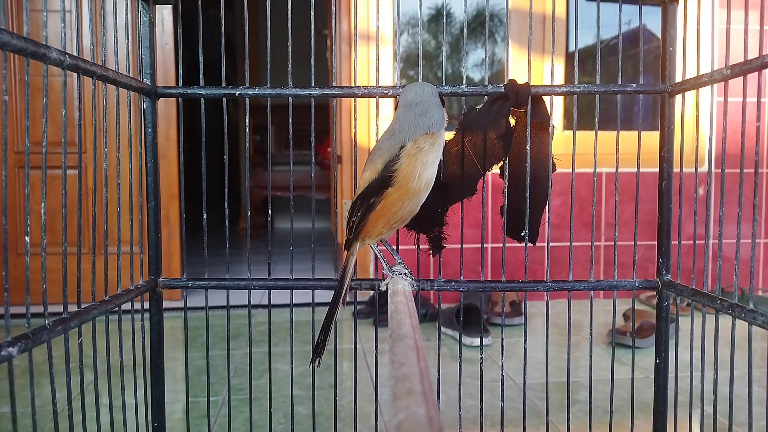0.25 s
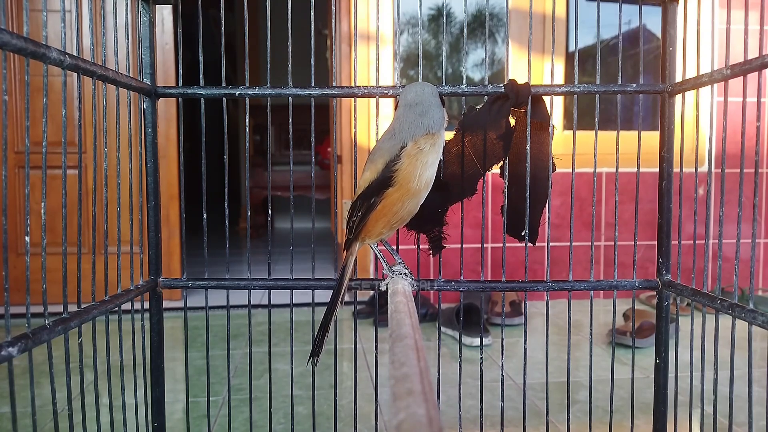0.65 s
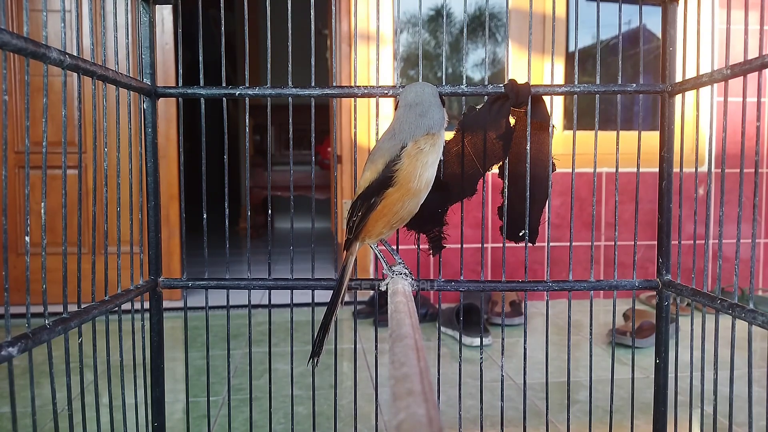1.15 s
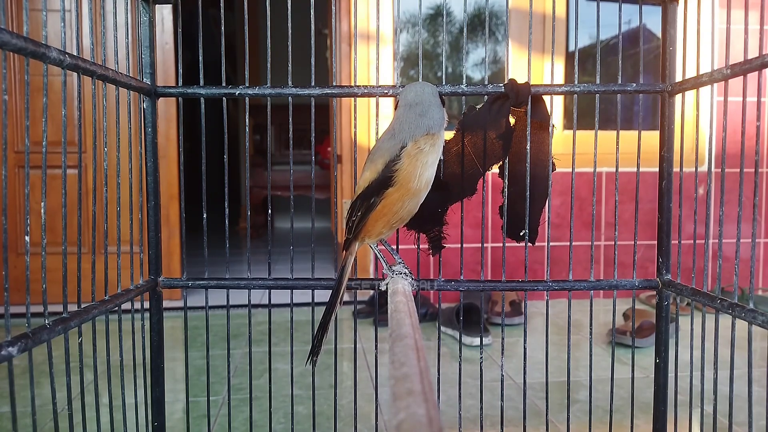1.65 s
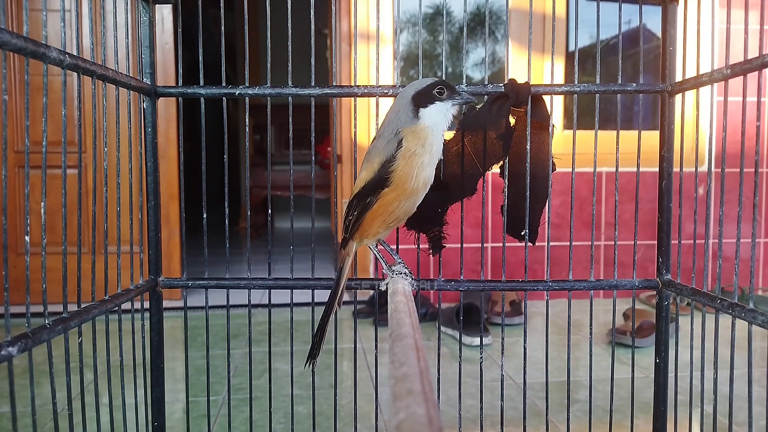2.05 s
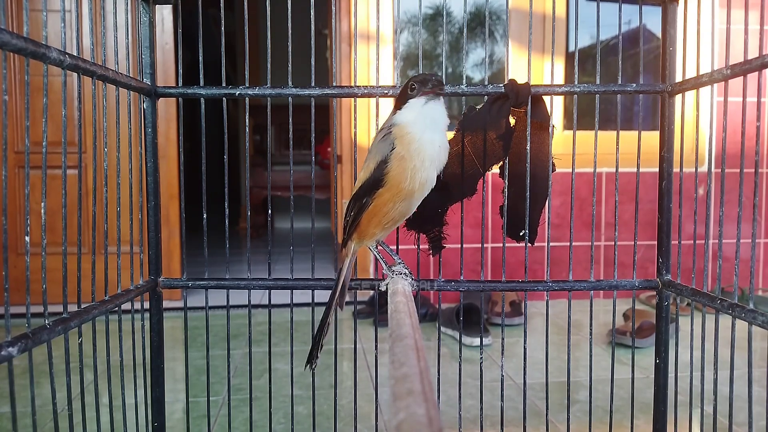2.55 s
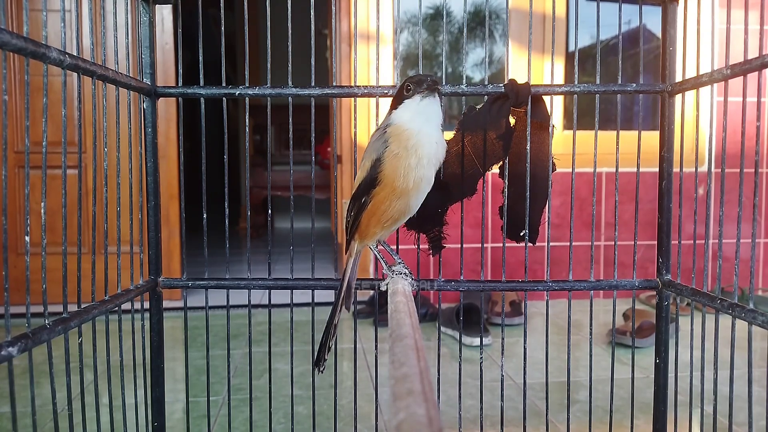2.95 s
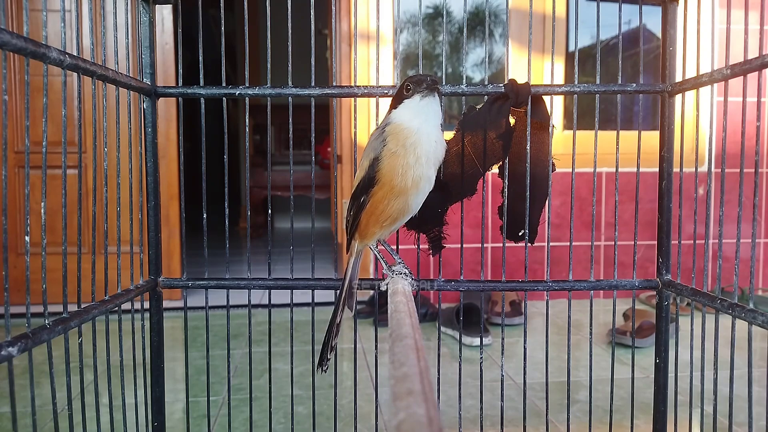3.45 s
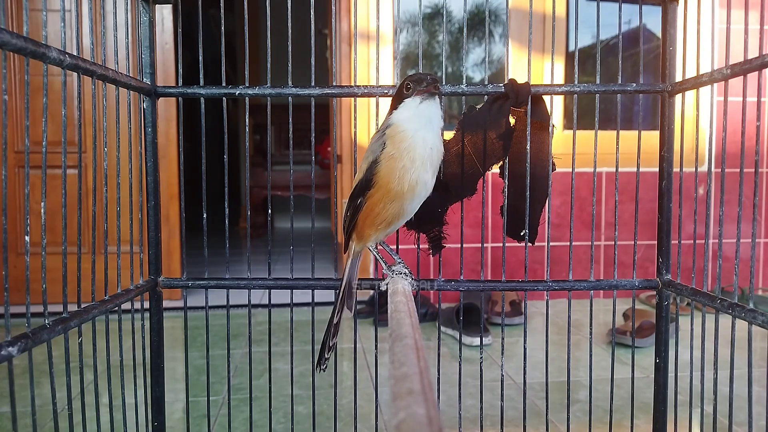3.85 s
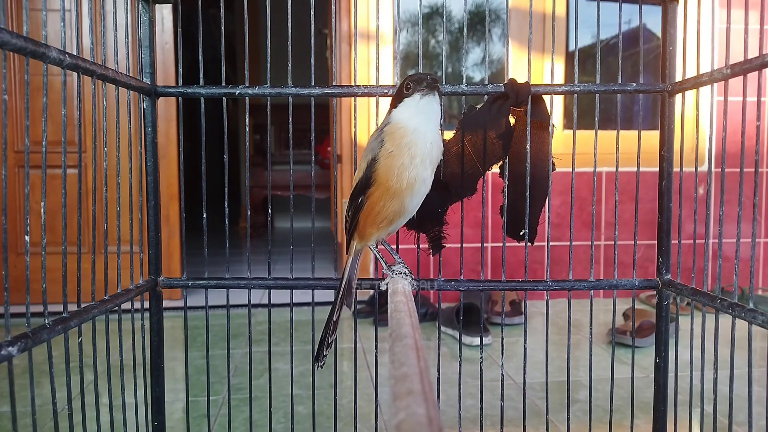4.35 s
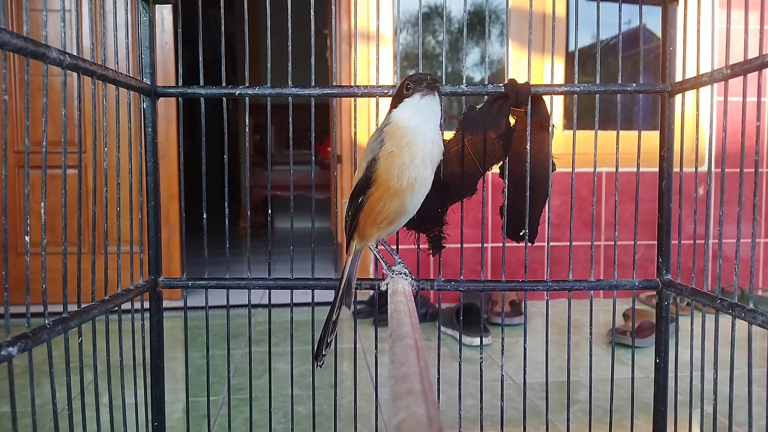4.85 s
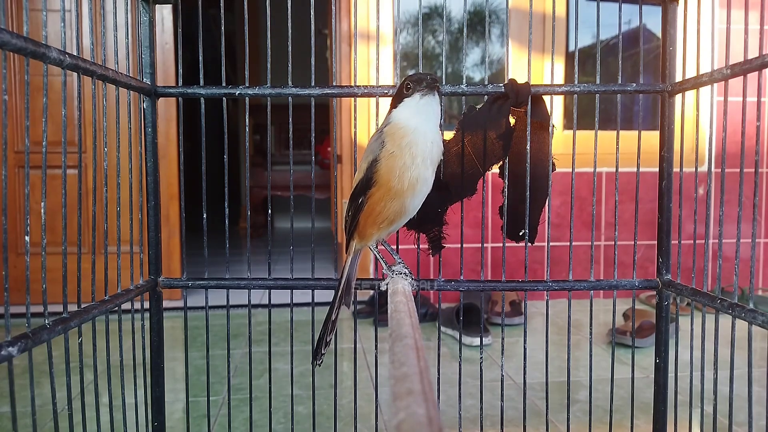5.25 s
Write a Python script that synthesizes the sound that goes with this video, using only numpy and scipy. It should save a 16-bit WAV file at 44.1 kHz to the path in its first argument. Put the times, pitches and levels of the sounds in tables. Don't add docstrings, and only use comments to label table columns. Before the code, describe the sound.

A quiet porch with far traffic rumble, thin hiss and weak insect trills. A spray bottle puffs, a dove coos far off, a second stronger puff spits droplets, and the dove ends on a low note. Feathers brush softly, then a shrike very near the microphone rasps sharply, pauses, and rasps again, longer and slightly higher. The last second and a half holds only background and tiny rustles.

```python
import sys
import numpy as np
from scipy import signal
from scipy.fft import rfft, irfft, next_fast_len
from scipy.io import wavfile
from scipy.ndimage import uniform_filter1d, minimum_filter1d, map_coordinates

SR = 44100
rng = np.random.default_rng(int(sys.argv[2]) if len(sys.argv) > 2 else 0)


def natural_amplitude(level_db):
    exponent = np.asarray(level_db, float) / 20
    return 10 ** exponent


def pcm_store(signal):
    levels = np.round(np.clip(np.atleast_2d(signal), -1, 1) * 32767)
    wavfile.write(sys.argv[1], SR, levels.astype(np.int16).T)


N = 242991

# start in seconds, length in seconds, low voice in Hz,
# high voice at its crest in Hz, high voice in the opening chirp in Hz.
RASPS = [
    (2.568, .192, 1287, 1509, 1692),
    (3.884, .23, 1314, 1551, 1768),
]


def unit(x):
    return x / np.sqrt(np.mean(x ** 2) + 1e-20)


def along(points, hz):
    f, v = np.transpose(points)
    return np.interp(np.log(hz + 1), np.log(f + 1), v)


def curves(rows):
    s, *columns = np.transpose(rows)
    return [np.interp(np.arange(N) / SR, s, column) for column in columns]


def gated_curves(tables, rise, fall):
    t = np.arange(N) / SR
    gate = 0
    for rows in tables:
        start, end = rows[0][0], rows[-1][0]
        gate = gate + np.clip(np.minimum((t - start) / rise, (end - t) / fall), 0, 1)
    return gate, curves([row for rows in tables for row in rows])


def wobble(rate):
    return map_coordinates(rng.standard_normal(int(N * rate / SR) + 4), [np.arange(N) * rate / SR])


def filtered(x, response):
    m = next_fast_len(N + SR // 2)
    return irfft(rfft(x, m) * response(np.fft.rfftfreq(m, 1 / SR)), m)[..., :N]


def band(x, low_hz, high_hz):
    return unit(filtered(x, lambda hz: 1 / (1 + (low_hz / (hz + 1)) ** 16) / (1 + (hz / high_hz) ** 16)))


def held(x, low_hz, high_hz):
    y = band(x, low_hz, high_hz)
    return y / np.sqrt(np.abs(uniform_filter1d(y ** 2, size=SR // 60)) + 1e-3)


def bumps(modes):
    return lambda hz: natural_amplitude(sum(db * np.exp(-((hz - centre) / width) ** 2) for centre, width, db in modes))


def pair(spectrum, alike):
    def mid_side(hz):
        turn = np.arccos(np.clip(along(alike, hz), -1, 1)) / 2
        return natural_amplitude(along(spectrum, hz)) * [np.cos(turn), np.sin(turn)]

    mid, side = filtered(rng.standard_normal((2, N)), mid_side)
    return unit(np.array([mid + side, mid - side]))


def traffic_and_air():
    # frequency in Hz, level in dB per Hz.
    rumble_colour = [(12, -76.5), (20, -45.5), (48, -29), (63, -11.5), (102, -0.5), (205, -3), (305, -9.5),
                     (335, -9.5), (387, -8.5), (900, -24), (1170, -56), (1980, -120)]
    # frequency in Hz, level in dB per Hz.
    air_colour = [(600, -24), (900, -0.5), (2000, -3.5), (5000, -13), (7200, -16.5), (9000, -14.5),
                  (12500, -14.5), (15500, -15.5), (16200, -29.5)]
    # frequency in Hz, left-right likeness from -1 to 1.
    likeness = [(60, 0.55), (130, 0.94), (290, 0.79), (640, 0.37), (1410, -0.11), (3100, 0.25),
                (6820, -0.092), (15000, -0.01)]
    rumble = natural_amplitude(-58.5 + 1.13 + 0.36 * wobble(1.4)) * pair(rumble_colour, likeness)
    hiss = natural_amplitude(-70 + 2.5 + 0.5 * wobble(2.4)) * pair(air_colour, likeness)
    return rumble + hiss


def crickets():
    # middle in seconds, length in seconds, level in dB.
    trills = [(0.087, 0.25, -80), (0.356, 0.14, -79), (0.827, .26, -81), (1.072, .22, -80), (1.44, .1, -83),
              (1.92, 0.25, -78.5), (2.17, .2, -79.5), (2.44, 0.22, -79), (3.3, 0.25, -81.5),
              (3.725, .19, -78), (4.465, 0.22, -81), (4.7, .2, -82), (4.9, .2, -81), (5.225, .19, -81),
              (5.455, .15, -79.5)]
    # middle in seconds, length in seconds, level in dB, pitch in Hz.
    other_insects = [
        (0.89, .3, -79, 3440),
        (2.38, .36, -89, 8200),
        (5.065, .25, -86, 8930),
        (4.87, .12, -80.5, 6400),
    ]
    t = np.arange(N) / SR
    blur = band(rng.standard_normal((2, N)), 0.92, 200)
    pitched = [(*row, 5720 + 50 * rng.standard_normal()) for row in trills]  # Hz, scattered
    song = 0
    for middle, length, db, hz in pitched + other_insects:
        song = song + natural_amplitude(db - 26 * ((t - middle) / length) ** 2) * np.sin(2 * np.pi * hz * t)
    return song * blur * natural_amplitude(6.5 + 1.5 * wobble(45))


def squirt(s, hold, db, drift, mist_db):
    pull_s, drip_s = 0.016, 0.049
    steps = [(0, -7), (pull_s, 0), (pull_s + hold, drift * hold),
             (pull_s + hold + drip_s, drift * hold - 23)]
    return [(s + u, db + change, mist_db + 0.3 * change - 51.5 * u) for u, change in steps]


def spray():
    # start in seconds, hold in seconds, level in dB, drift in dB per second,
    # fine mist in dB.
    pulls = [
        (0.15, .074, -43.5, 31, 0),
        (1.476, 0.077, -36.5, -66.5, 0.5),
    ]
    # frequency in Hz, level in dB per Hz.
    nozzle_colour = [(200, -13), (500, -15), (1100, -16.5), (2500, -9.5), (4500, -9), (7000, -12),
                     (9000, -1), (11000, -10.5), (12500, -6), (15000, -3), (16000, -13)]
    # centre in Hz, width in Hz, gain in dB.
    cavity = [(4600, 250, 6), (8000, 250, -14), (11900, 220, 7)]
    gate, (db, mist_db) = gated_curves([squirt(*row) for row in pulls], rise=0.0011, fall=0.02)
    jet = filtered(pair(nozzle_colour, [(600, 1.0), (3000, 0.074), (15000, 0.1)]), bumps(cavity))
    jet = 0.54 * band(jet, 250, 7800) + natural_amplitude(mist_db) * band(jet, 10000, 17000)
    return gate * natural_amplitude(db + 0.5 + 1.7 * wobble(150) + 1.4 * wobble(600)) * jet


def ticks():
    # start in seconds, peak in dB, highest frequency in Hz.
    spits = [(.151, -39.5, 16000), (0.169, -38.5, 7000), (0.217, -42.5, 16000), (1.477, -34.5, 15980),
             (1.508, -29.5, 15900), (1.539, -39, 16000), (1.584, -36.5, 4000), (2.151, -58, 15950),
             (2.403, -59, 16140), (2.558, -42.5, 3505), (2.857, -39.5, 16000), (2.863, -40, 15990),
             (3.719, -57, 16000), (5.23, -64, 16000)]
    t, out = np.arange(SR // 50) / SR, np.zeros((2, N))
    for s, peak_db, top_hz in spits:
        bandpass = signal.butter(2, [800, top_hz], "band", fs=SR, output="sos")
        burst = signal.sosfilt(bandpass, rng.standard_normal((2, len(t))))
        out[:, round(s * SR):][:, :len(t)] += natural_amplitude(peak_db - 60 * t / 0.013) * burst / burst.std()
    return out


def coo_note(s, length, top_hz, db, fall):
    rest_hz, swoop_s = 577, 0.021
    pouch_hz, pouch_width_hz = 673, 28.5
    u = np.linspace(0, length, num=40)
    slide_back = np.sin(np.pi / 2 * np.clip((length - u) / fall, 0, 1)) ** 1.9
    hz = rest_hz + (top_hz - rest_hz) * (1 - np.exp(-u / swoop_s)) * slide_back
    throb = np.maximum(0.15, (length > 0.3) * (hz - 670) / 60)
    swell_db = -12.5 * np.exp(-u / 0.016)
    tire_db = -9.5 * u
    level_db = db + swell_db + tire_db - ((hz - pouch_hz) / pouch_width_hz) ** 2
    return list(zip(s + u, hz, level_db, throb))


def dove():
    # start in seconds, length in seconds, top pitch in Hz, level in dB,
    # falling part in seconds.
    coos = [
        (0.545, 0.087, 760.7, -44.5, .078),
        (0.827, .228, 737, -41.5, .055),
        (1.266, 0.44, 763.8, -41, .34),
        (2.221, .157, 704, -43.5, .075),
    ]
    gate, (hz, db, throb) = gated_curves([coo_note(*row) for row in coos], rise=0.006, fall=0.007)
    flutter = 2 * np.pi * np.cumsum(80 + 50 * wobble(60)) / SR
    throb = np.clip(throb, 0, 1)
    phase = 2 * np.pi * np.cumsum(hz * (1 + 0.004 * wobble(51))) / SR
    phase = phase + 0.85 * throb * np.cos(flutter)
    return gate * natural_amplitude(db) * (1 + 0.75 * throb * np.sin(flutter)) * np.sin(phase)


def feathers():
    # time of the peak in seconds, peak in dB.
    strokes = [
        (2.055, -64),
        (2.402, -73.5),
        (2.56, -93),
        (4.974, -83),
        (5.084, -79),
        (5.206, -76.5),
        (5.33, -82),
        (5.5, -73),
    ]
    # frequency in Hz, level in dB per Hz.
    feather_colour = [(4120, -61), (7000, -32), (7760, -39), (8080, -9), (9470, 0.5), (13400, -10),
                      (15500, -27)]
    t = np.arange(N) / SR
    brush = sum(natural_amplitude(db + np.minimum(500 * (t - s), 69.5 * (s - t))) for s, db in strokes)
    return brush * natural_amplitude(2 * wobble(76)) * pair(feather_colour, [(9000, 0.2)])


def syrinx():
    # start in seconds, length in seconds, high voice in dB,
    # hoarseness as a share, beat depth from 0 to 1.
    registers = [
        (3.935, .048, -15, .5, .27),
        (3.99, .058, 5, .6, .95),
    ]
    chirp_s, snap_s, sag_s, switch_s = 0.012, 0.004, 0.021, 0.01
    chirp_low_hz, high_start_hz = 1597, 1470
    tired_hz, spent_hz = (1194, 1505), (854, 1302)
    chirp_db, rasp_db, spent_db = 3, -0.5, -4.5
    clean, early, late = (0.02, 0.05, 0.4), (0.03, 0.07, 0.55), (0.042, 0.17, 0.75)
    rows = []
    for s, length, low_hz, crest_hz, chirp_hz in RASPS:
        rows += [(s, chirp_low_hz, chirp_hz, chirp_db, *clean),
                 (s + chirp_s, chirp_low_hz, chirp_hz, chirp_db, *clean),
                 (s + chirp_s + snap_s, low_hz, high_start_hz, rasp_db, *early),
                 (s + 0.5 * length, low_hz, crest_hz, rasp_db, *late),
                 (s + 0.7 * length, low_hz, crest_hz, rasp_db, *late),
                 (s + length - sag_s, *tired_hz, rasp_db, *late),
                 (s + length, *spent_hz, spent_db, *late)]
    low_hz, high_hz, high_db, unrest, breath, depth = curves(rows)
    t = np.arange(N) / SR
    for s, length, db, hoarse, beat in registers:
        on = np.clip(np.minimum(t - s, s + length - t) / switch_s + 1, 0, 1)
        high_db = high_db + on * (db - high_db)
        depth = depth + on * (beat - depth)
        unrest = unrest * hoarse ** on
        breath = breath * hoarse ** (2.5 * on)
    return low_hz, high_hz, high_db, unrest, breath, depth


def membrane(hz, unrest):
    phase = 2 * np.pi * np.cumsum(hz * (1 + 1.15 * unrest * wobble(750))) / SR
    return sum(np.cos(k * phase + 2 * np.pi * rng.random()) for k in range(1, 13))


def windpipe(x, elapsed):
    # centre in Hz, width in Hz, gain in dB.
    side_branches = [(2050, 170, -21), (4950, 150, -17), (5900, 230, -17), (7300, 130, -10),
                     (11050, 520, -22)]
    hz, t, z = signal.stft(x, SR, nperseg=512, noverlap=384)
    at, hz = np.minimum((t * SR).astype(int), N - 1), hz[:, None]
    slide = 1.03 + (0.97 - 1.03) * np.clip(elapsed[at] / 0.2, 0, 1)
    dips = []
    for centre, width, db in side_branches:
        depth = np.clip(1 + 0.5 * wobble(25)[at], 0.6, 2)
        dips.append((centre * slide, width, db * depth))
    ceiling_hz = 15700 - 11000 * elapsed[at]
    ceiling = 1 / (1 + (hz / ceiling_hz) ** 80)
    return signal.istft(z * bumps(dips)(hz) * ceiling, SR, nperseg=512, noverlap=384)[1][:N]


def low_thumps():
    # time in seconds, level in dB.
    thumps = [
        (2.579, -40),
        (2.622, -43),
        (2.862, -49),
        (3.896, -36),
    ]
    t = np.arange(N) / SR
    return sum(natural_amplitude(db) * (1 - 2 * ((t - s) / 0.00054) ** 2) * np.exp(-((t - s) / 0.00032) ** 2)
               for s, db in thumps)


def shrike():
    # time in seconds, level in dB, beak opening in dB.
    effort = [
        [(2.572, -17, -10.5), (2.584, -20, 5), (2.68, -27.5, 4), (2.688, -20, 0), (2.742, -21.5, -13.5),
         (2.765, -30, -8.5)],
        [(3.888, -17.5, -1), (3.899, -21.5, 0.5), (3.955, -27, 8), (4.019, -18.5, -10.5), (4.061, -21.5, -20.5),
         (4.097, -23.5, -16), (4.118, -33.5, -10)],
    ]
    # frequency in Hz, level in dB per Hz.
    throat = [(410, -81.5), (700, -45.5), (1540, -18.5), (2100, -7), (2590, -3.5), (3890, -2.5),
              (4430, -8.5), (4860, -17), (9110, -22.5), (10500, -24), (10900, -41.5), (11800, -18.5),
              (13500, -13), (15200, -27), (16000, -60)]
    low_hz, high_hz, high_db, unrest, breath, depth = syrinx()
    gate, (db, beak_db) = gated_curves(effort, rise=0.003, fall=0.012)
    turns = []
    for (s, length, *_), facing in zip(RASPS, (-5, 3)):
        turns += [(s, 0, facing), (s + length, length, facing)]
    elapsed, facing_db = curves(turns)
    bright_db = -4.5 + 0.82 * beak_db
    edge_db = -7 + facing_db + 0.6 * beak_db - 40 * elapsed
    low = membrane(low_hz, unrest)
    high = membrane(high_hz, unrest)
    beat_hz = (high_hz - low_hz) * (1 + 6 * unrest * wobble(200))
    beat = 1 + depth * np.cos(2 * np.pi * np.cumsum(beat_hz) / SR)
    tone = unit(low * natural_amplitude(1.1 * wobble(260)) + high * natural_amplitude(high_db + 3.8 * wobble(200)))
    source = np.sqrt(1 - breath) * tone + np.sqrt(breath) * rng.standard_normal(N)
    voice = filtered(source, lambda hz: natural_amplitude(along(throat, hz)))
    body = held(beat * voice, 300, 3500) + natural_amplitude(beak_db) * held(np.sqrt(beat) * voice, 3500, 5000)
    shine = natural_amplitude(bright_db) * held(voice, 5000, 13300)
    shine = shine + natural_amplitude(bright_db + edge_db) * held(voice, 13300, 15500)
    return gate * natural_amplitude(db) * windpipe(body + shine, elapsed) + low_thumps()


def at_the_phone(bird):
    # frequency in Hz, left over right in dB.
    pan = [(700, 4.5), (1400, 3), (2300, 3.5), (2700, -3), (3100, 6.5), (3500, -3.5), (3900, -3),
           (4400, -8.5), (5200, 0.5), (7200, 6.5), (9000, 11), (13000, 1.5)]
    # frequency in Hz, lead of the left in radians.
    lead = [(0, -2.5), (2500, 1.23), (2930, 1.36), (3450, 0.5), (4050, -6), (4740, -2.5), (7060, -2),
            (9220, -5.5), (11700, -1), (12100, -5.5), (12600, -10.5), (12900, -8), (14000, -8),
            (15800, -7.5)]
    half = np.array([[0.5], [-0.5]])
    return filtered(bird, lambda hz: natural_amplitude(3.5 + half * along(pan, hz)) * np.exp(1j * half * along(lead, hz)))


def room(x, stretch, delay):
    # frequency in Hz, time to fall 60 dB in seconds.
    porch_decay = [(600, 0.72), (1500, 0.28), (3000, 0.38), (6000, .35), (12000, .3), (14300, 0.1)]
    out, step = np.zeros((2, N + 2 * SR)), SR // 2
    for start in range(0, N, step):
        hz, t, z = signal.stft(rng.standard_normal((2, SR // 2)), SR, nperseg=256)
        decay = natural_amplitude(-60 * t / (stretch * along(porch_decay, hz)[:, None]))
        tail = signal.istft(z * decay, SR, nperseg=256)[1]
        wet = signal.fftconvolve(x[None, start:start + step], tail / np.linalg.norm(tail[0]), axes=1)
        out[:, start + int(delay * SR):][:, :wet.shape[1]] += wet
    return out[:, :N]


def scene():
    background = traffic_and_air() + crickets() + feathers()
    small = spray() + ticks()
    coo = dove()
    bird = shrike()
    porch = natural_amplitude(-8) * room(bird, stretch=1.087, delay=0.0037)
    porch = porch + natural_amplitude(-11) * room(small[0], stretch=0.9, delay=0.004)
    yard = natural_amplitude(1.5) * coo + natural_amplitude(-6) * room(coo, stretch=1.2, delay=0.018)
    return at_the_phone(bird) + small + porch + yard + background


def band_limit(x):
    return signal.sosfilt(signal.butter(12, 16270, fs=SR, output="sos"), x)


def record(dry):
    need = np.minimum(1, 0.75 / (np.abs(dry).max(axis=0) + 1e-9))
    gain = uniform_filter1d(minimum_filter1d(need, size=180), size=180)
    mix = filtered(dry * gain, lambda hz: 1 / (1 + (hz / 15800) ** 60))
    return band_limit(mix)


dry = scene()
out = record(dry)
pcm_store(out)
```